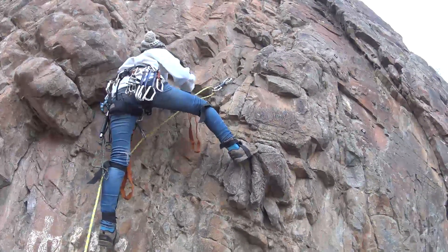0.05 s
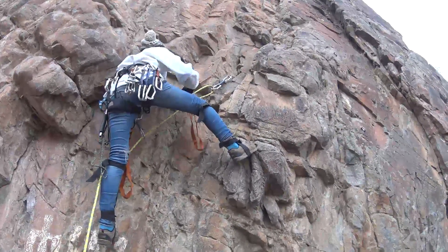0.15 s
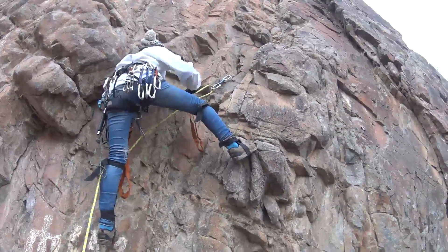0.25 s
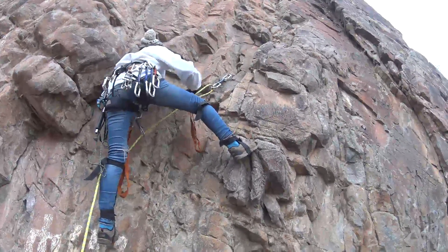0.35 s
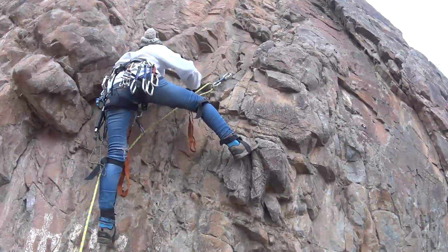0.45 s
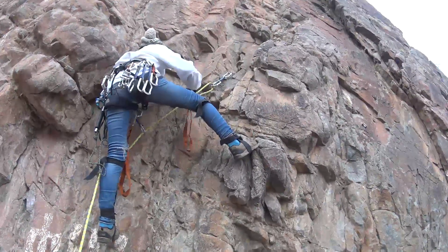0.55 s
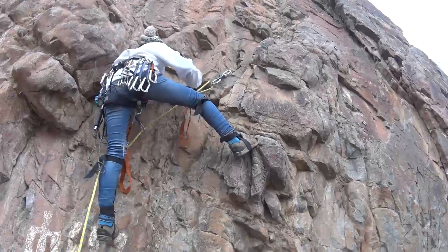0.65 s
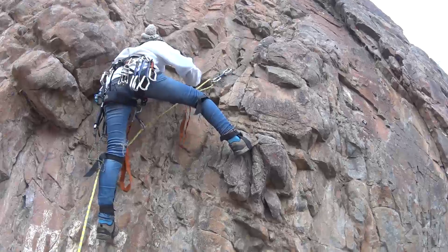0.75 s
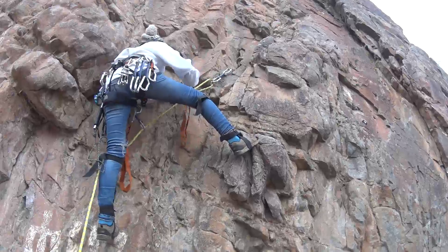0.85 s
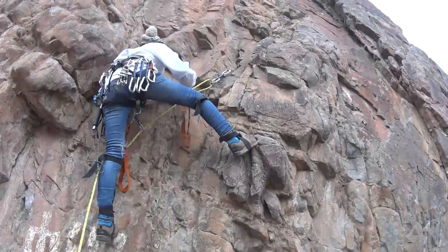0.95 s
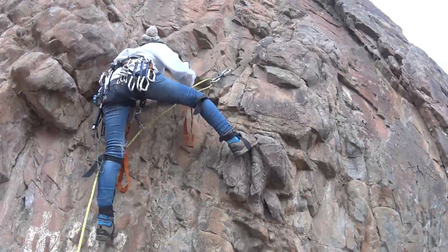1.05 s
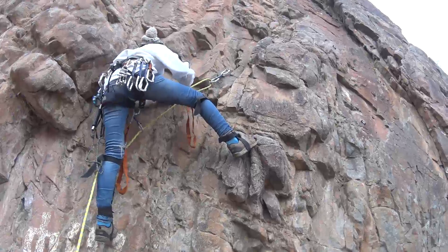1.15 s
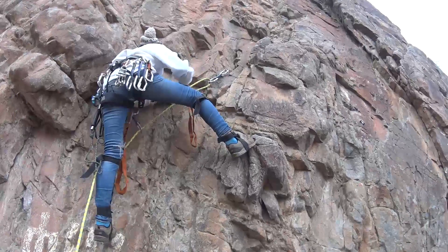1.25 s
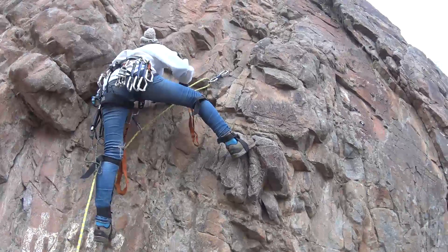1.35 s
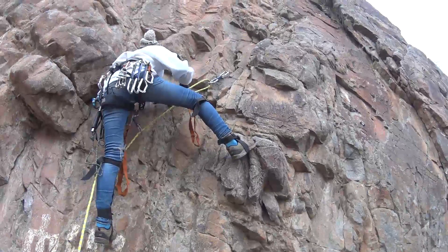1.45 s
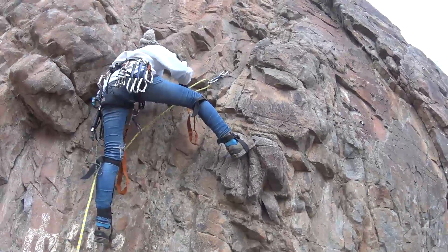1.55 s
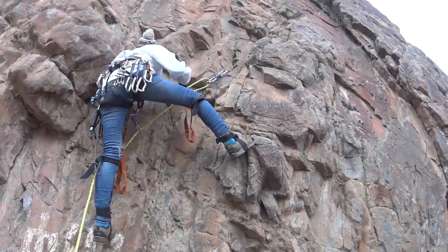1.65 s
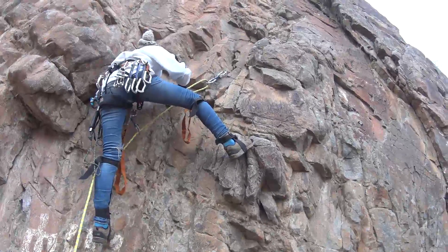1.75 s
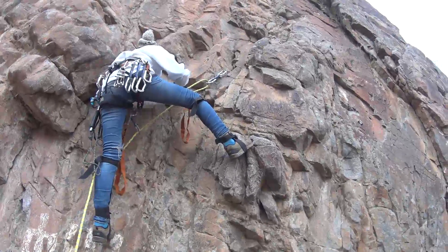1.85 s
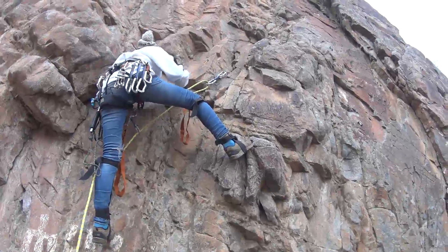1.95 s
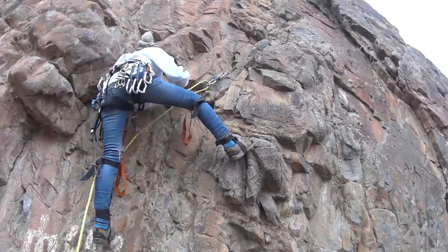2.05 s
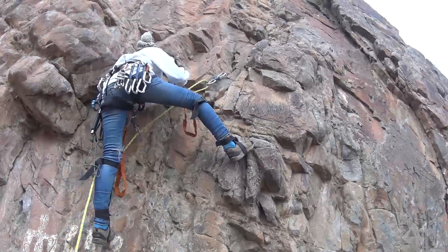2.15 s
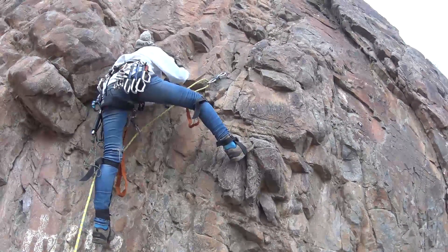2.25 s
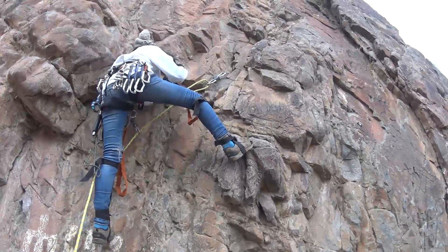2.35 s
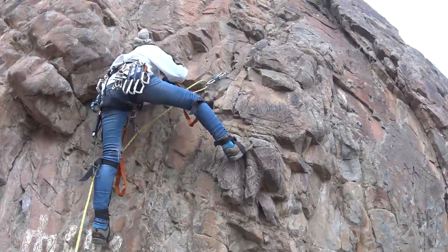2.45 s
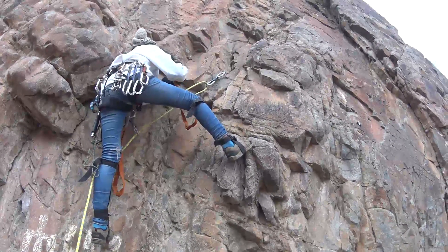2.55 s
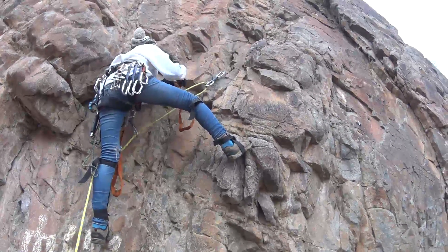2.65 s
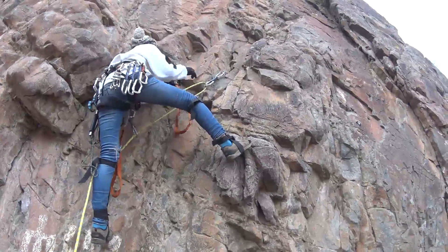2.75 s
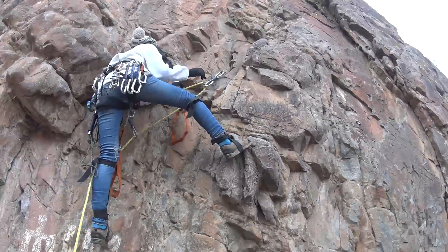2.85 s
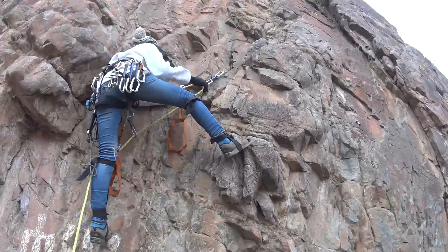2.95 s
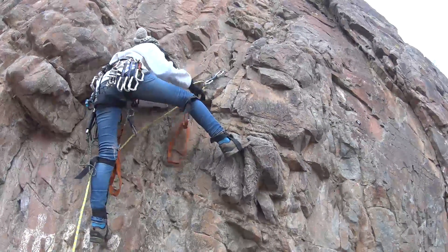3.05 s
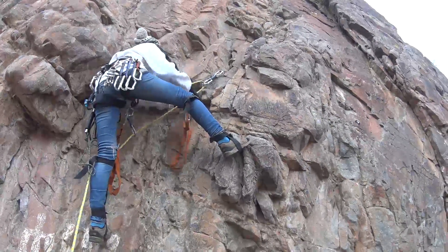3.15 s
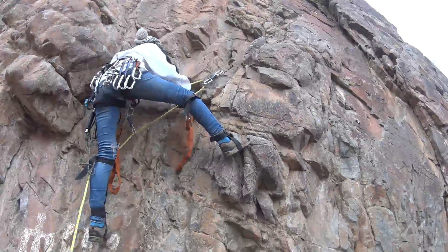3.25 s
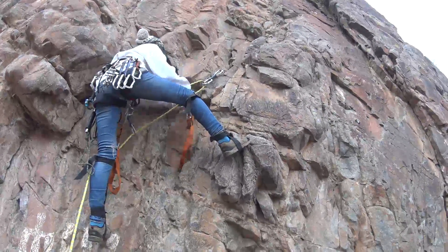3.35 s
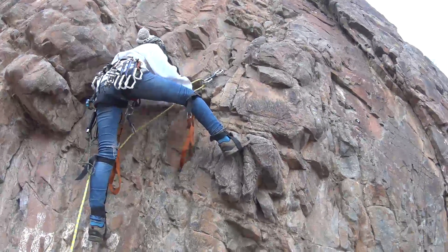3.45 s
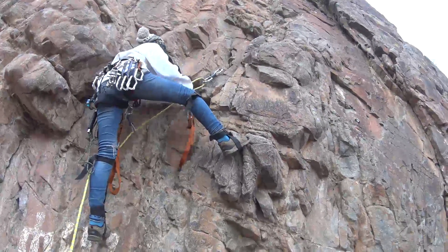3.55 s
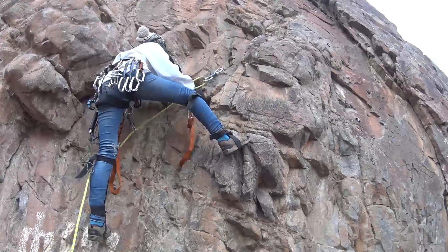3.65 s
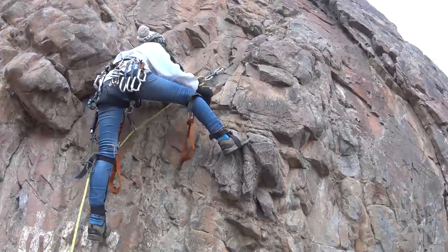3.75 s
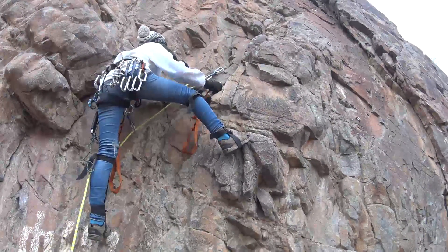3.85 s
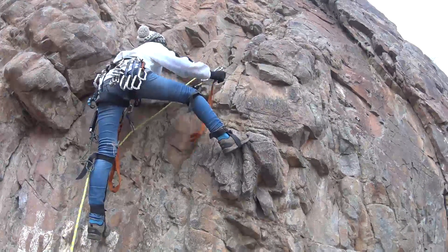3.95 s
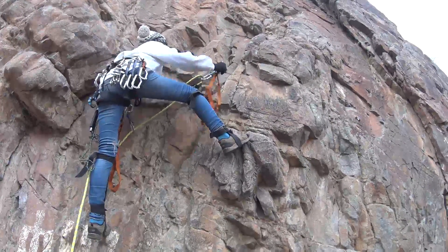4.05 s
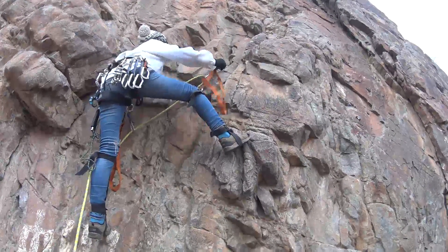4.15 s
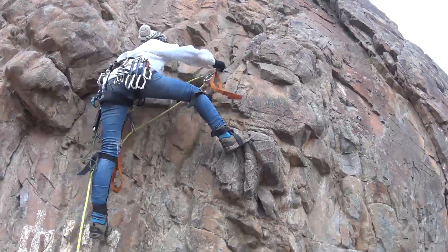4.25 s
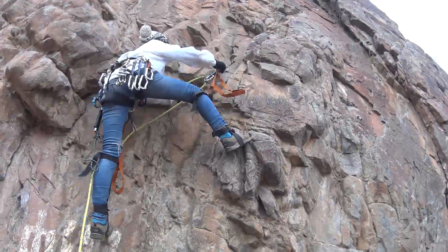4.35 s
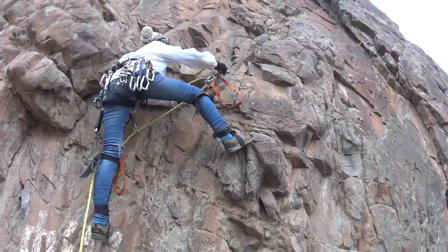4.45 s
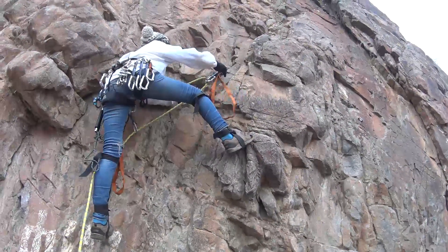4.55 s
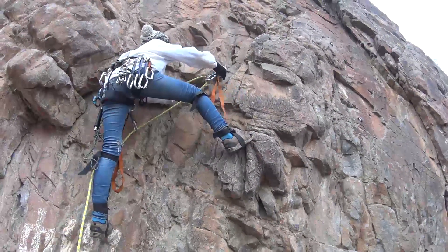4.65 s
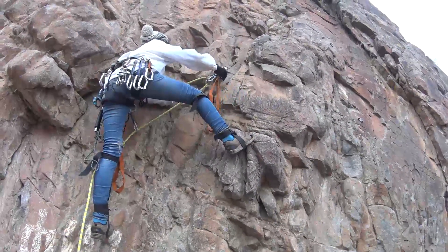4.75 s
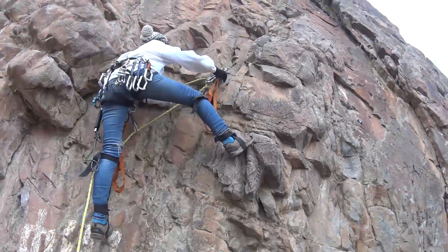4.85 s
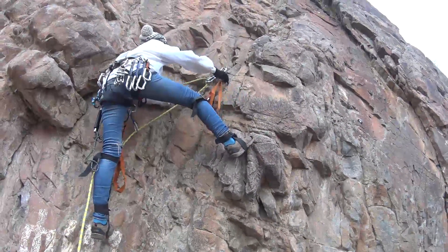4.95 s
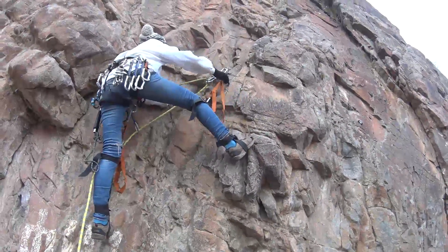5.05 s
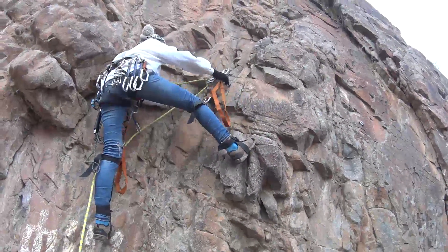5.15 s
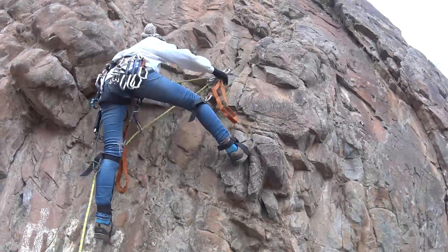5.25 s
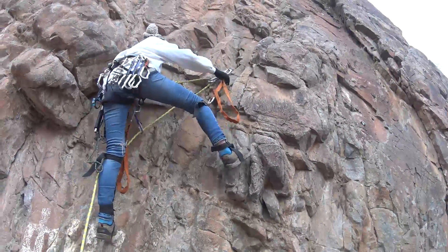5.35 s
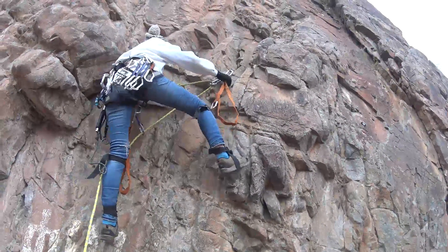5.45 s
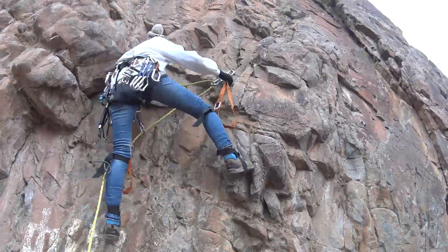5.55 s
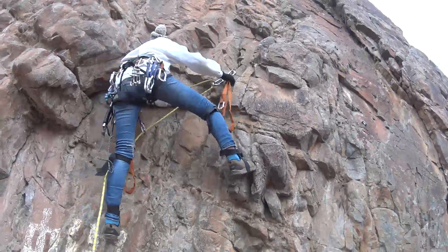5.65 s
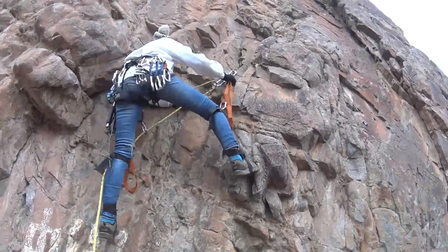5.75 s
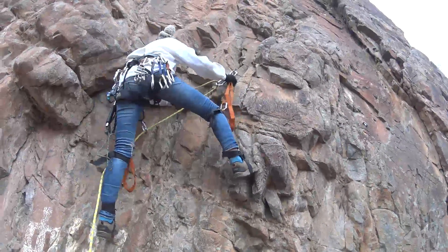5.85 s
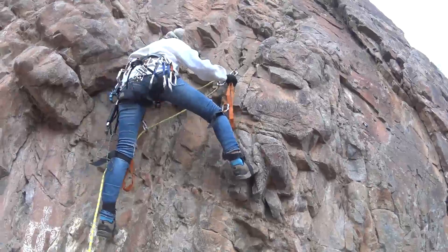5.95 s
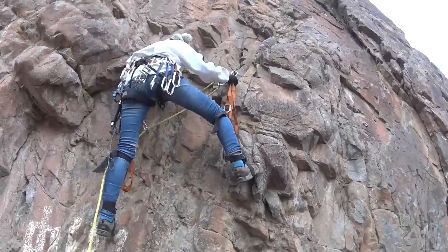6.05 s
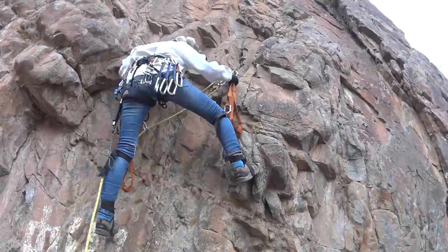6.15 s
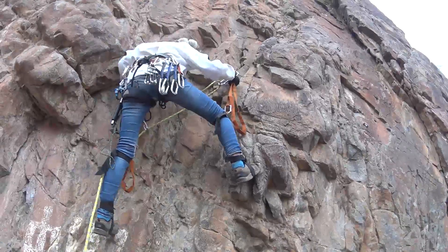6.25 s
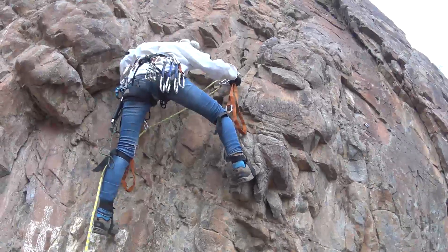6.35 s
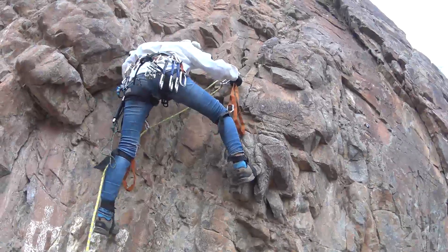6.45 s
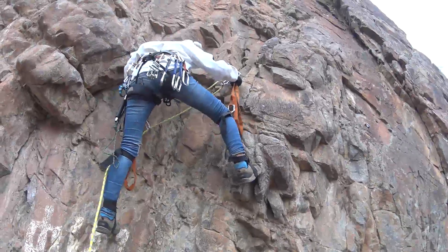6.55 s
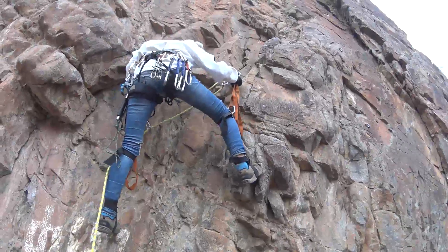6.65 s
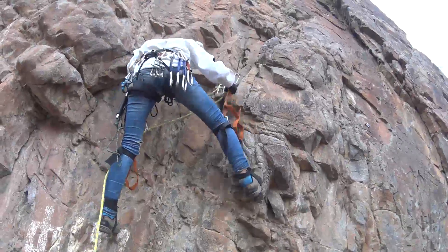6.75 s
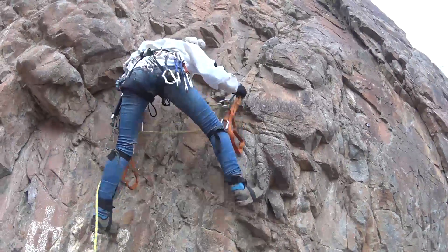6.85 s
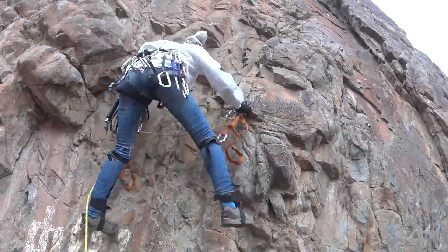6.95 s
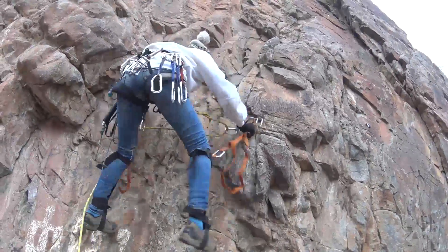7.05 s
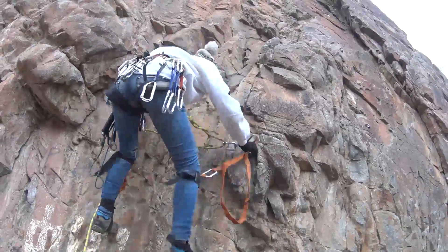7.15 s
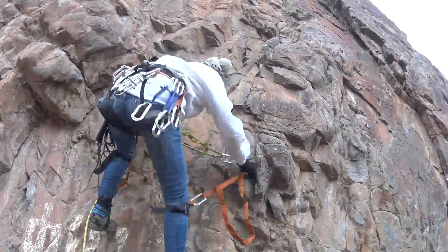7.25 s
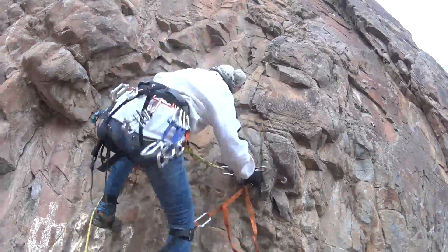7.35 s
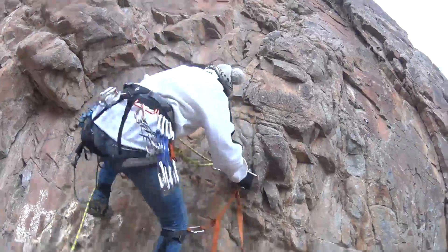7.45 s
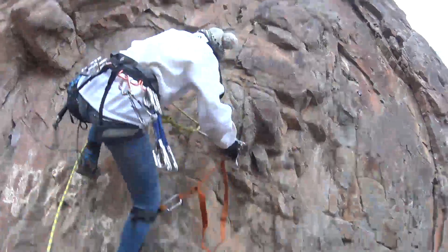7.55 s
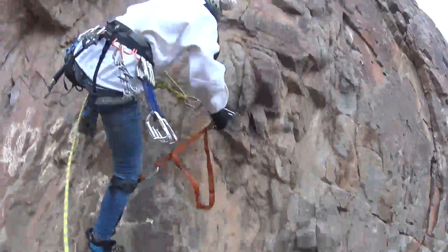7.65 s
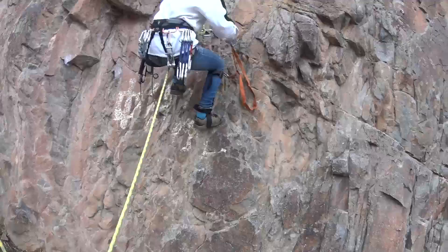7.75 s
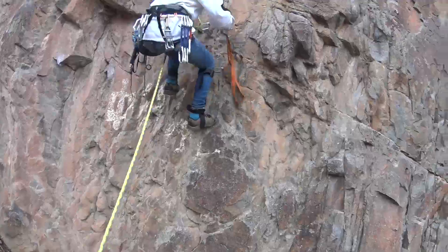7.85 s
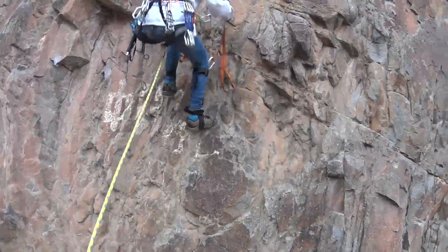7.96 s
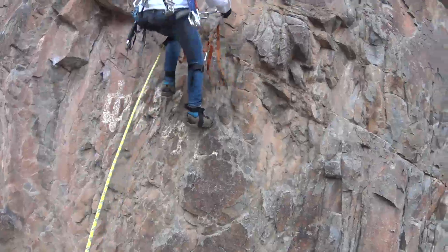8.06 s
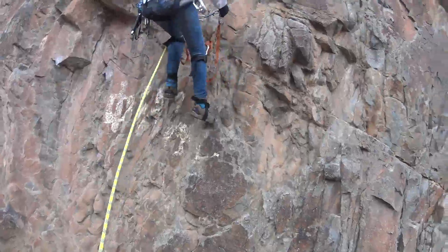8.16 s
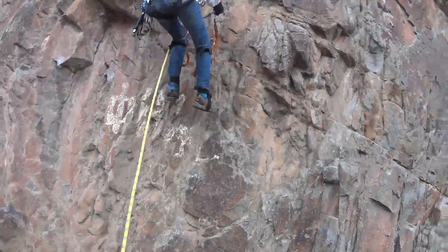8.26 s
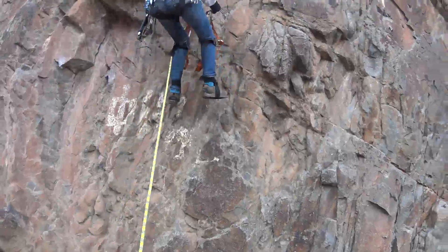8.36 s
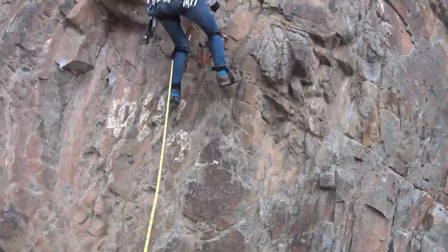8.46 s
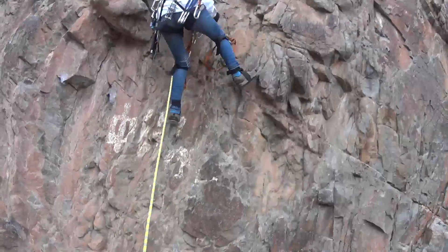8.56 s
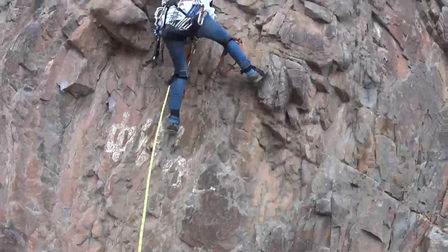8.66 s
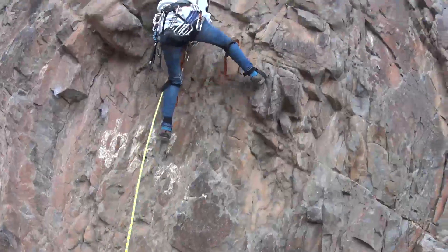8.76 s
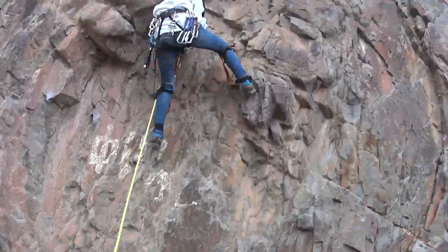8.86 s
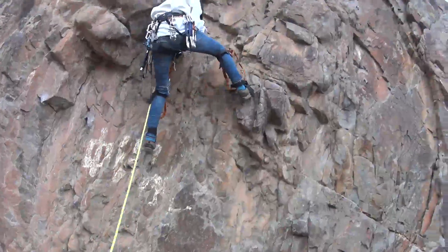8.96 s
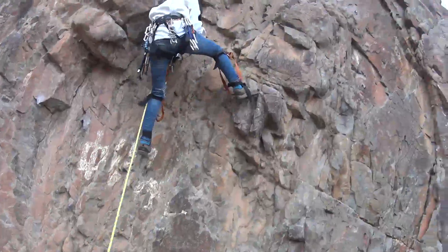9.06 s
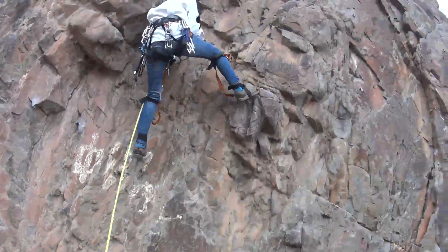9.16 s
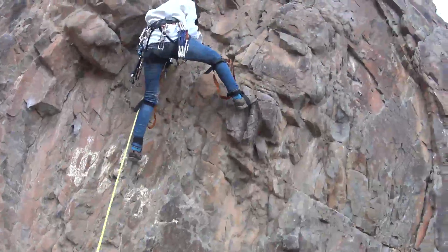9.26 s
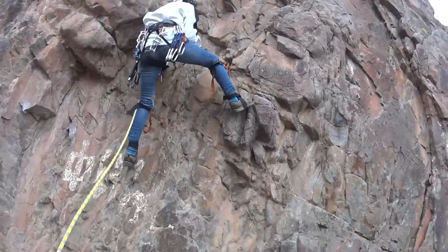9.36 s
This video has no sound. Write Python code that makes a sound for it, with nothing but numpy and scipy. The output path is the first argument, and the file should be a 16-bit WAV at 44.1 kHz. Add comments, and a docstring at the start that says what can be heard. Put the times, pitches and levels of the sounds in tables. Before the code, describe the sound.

A steady, soft outdoor rush lies under everything, wavering very slightly. At 0.1, 0.5 and 0.8 seconds there are faint small metal ticks and thin rings, then only air until a light clink at 4.6. From 5.5 to 6.3 scattered dry carabiner clacks grow firmer, one ringing briefly at 5.7. At 6.7 a dull knock and double clack start the main swing: from 6.8 to 7.8 loud, crowded clacks, bright high rings and overlapping jangle, strongest near 6.95 and 7.4 to 7.6, with a camera bump at 7.4 and faint low rumble. It thins to isolated clacks by 7.8 and 8.3. At 8.5 to 8.7 comes a short jangle with a piercing high ring, dull knocks and low thumps of camera handling. Light clinks at about 9.0, 9.15 and 9.3 end it. The handheld microphone sits a few metres below, with almost no echo.

```python
"""Carabiners on a climber's harness clack, ring and jangle as the rack swings against outdoor rock.
Clacks and jangle are coloured noise bursts with brief rings; free carabiners ring as decaying sine modes.
A steady outdoor rush of shaped noise lies underneath, heard from a handheld camera a few metres below.
Decaying sines give dull knocks; pulses and low noise give the bumps and rumble of the moving camera."""
import sys
import numpy as np
from scipy import signal
from scipy.fft import rfft, irfft, next_fast_len
from scipy.io import wavfile
from scipy.ndimage import uniform_filter1d

SR = 44100
rng = np.random.default_rng(int(sys.argv[2]) if len(sys.argv) > 2 else 0)


def unload_wav(signal):
    """Save mono or channel-first audio to the path in sys.argv[1] as 16-bit WAV at rate SR, clipped to [-1, 1]."""
    wavfile.write(
        sys.argv[1],
        SR,
        np.round(np.clip(np.atleast_2d(signal).T, -1, 1) * 32767).astype(np.int16),
    )


N = 414099
T = np.arange(N) / SR


def amp(db):
    """Decibels to gain."""
    return 10 ** (np.asarray(db) / 20)


def unit(x):
    """Scales to an rms of one."""
    return x / np.sqrt(np.mean(x ** 2) + 1e-20)


def read(points, hz):
    """Reads a table on a logarithmic frequency axis."""
    f, value = np.transpose(points)
    return np.interp(np.log(hz + 1), np.log(f + 1), value)


def decay(t, t60):
    """Falls by 60 dB in t60 seconds."""
    return np.exp(-np.log(1000) * t / t60)


def add(mix, s, sound):
    """Mixes a sound in at time s."""
    part = mix[:, round(s * SR):][:, :sound.shape[-1]]
    part += sound[..., :part.shape[1]]


def colour(x, db_at):
    """Causal (minimum-phase) filter whose gain in dB is the function db_at of frequency."""
    size = next_fast_len(x.shape[-1] + 2048)
    log_gain = np.log(amp(db_at(abs(np.fft.fftfreq(size, 1 / SR)))))
    response = np.exp(np.conj(signal.hilbert(log_gain)))[:size // 2 + 1]
    return irfft(rfft(x, size) * response, size)[..., :x.shape[-1]]


def pair(z, likeness):
    """Makes two unrelated channels partly alike."""
    c = np.clip(likeness, 0, 1)
    return np.array([z[0], c * z[0] + np.sqrt(1 - c ** 2) * z[1]])


def envelope(rows, attack_s, release_t60, sag_db_per_s=0):
    """Each motion builds up, holds or sags in level, then dies away; overlapping motions add."""
    out = np.zeros(N)
    for start, length, db in rows:
        t = np.maximum(T - start, 0)
        attack = np.minimum(t / attack_s, 1)
        release = decay(np.maximum(t - length, 0), release_t60)
        out += attack * amp(db - sag_db_per_s * t) * release
    return out


# spectrum of the open air: f/Hz, relative level/dB per Hz
RUSH_SPECTRUM = [(25, -11.5), (70, -14.5), (125, -5), (220, -1.5), (420, -4), (700, -6), (1050, -1.5),
                 (1600, 1), (2500, -1), (3100, -5), (4700, -7.5), (5800, -14.5), (8000, -23), (11000, -30)]
# how alike the two channels of the open air are: f/Hz, likeness/0-1
RUSH_LIKENESS = [(30, 0.87), (200, 1), (800, 0.69), (1600, 0.91), (2150, 0.66), (3300, 0.9), (3950, 0.36),
                 (4500, 1), (5200, 0.25), (6200, 0.21), (6800, 0.89), (7500, 0.1), (10500, 0.76)]


def rush(level_db=-37.5, waver_db=0.43):
    """Steady distant outdoor noise, shaped by its spectrum, that wavers slightly."""
    size = next_fast_len(N)
    hz = np.fft.rfftfreq(size, 1 / SR)
    noise = rfft(rng.standard_normal((2, size)))
    shaped = pair(noise, read(RUSH_LIKENESS, hz)) * amp(read(RUSH_SPECTRUM, hz))
    knots = np.arange(0, T[-1], .1)
    waver = waver_db * np.interp(T, knots, rng.standard_normal(len(knots)))
    return unit(irfft(shaped, size)[:, :N]) * amp(level_db + waver)


# swings of the rack: start t/s, length/s, drive level/dB before each layer's own gain
RACK_SWINGS = [(6.819, 0.29, -37), (7.141, 0.066, -30), (7.262, 0.079, -39.5), (7.405, 0.38, -29),
               (8.466, 0.023, -35.5), (8.535, 0.058, -33.5), (8.95, 0.08, -40)]


def swing_level():
    """Drive of the swinging rack: it builds up fast, loses energy and settles."""
    return envelope(RACK_SWINGS, attack_s=0.021, release_t60=0.3, sag_db_per_s=17)


def swinging(s):
    """Whether the rack is swinging, or still settling, at time s."""
    settle_s = 0.06
    return any(start < s < start + length + settle_s for start, length, _ in RACK_SWINGS)


def contact_times(per_s):
    """Irregular moments of contact while the rack swings, one at random in each time slot."""
    slots = np.arange(int(T[-1] * per_s))
    times = (slots + rng.random(len(slots))) / per_s
    return [s for s in times if swinging(s)]


def crack(t60, direct=1.3, strike_db=3, strike_t60=0.0062, wall_db=-25, wall_t60=1.0, likeness=0.9):
    """One contact: a sharp tick, a dense short rattle of the metal, and faint scatter from the rock."""
    t = np.arange(SR // 6) / SR
    strike = amp(strike_db) * decay(t, strike_t60)
    wall = amp(wall_db) * decay(t, wall_t60)
    fade = strike + decay(t, t60) + wall
    burst = pair(rng.standard_normal((2, len(t))), likeness) * fade
    burst[:, 0] = direct * 2 * fade[0]  # the tick is a single sample
    return burst


def tinkle(t60, count=5, lowest_hz=3200, highest_hz=11000, port_radians=0.98):
    """Short ring of one of the many small parts, each with random modes of its own."""
    t = np.arange(SR // 12) / SR
    hz = lowest_hz * (highest_hz / lowest_hz) ** rng.random((count, 1))
    phase = port_radians * rng.standard_normal((2, count, 1))
    modes = np.sin(2 * np.pi * hz * t + phase)
    return modes.sum(1) * decay(t, t60) / np.sqrt(count)


# hard contacts: t/s, level/dB before gain, extra low body/dB, extra brightness/dB, main pitch f/Hz
CLACK_HITS = [(0.0998, -35, 7, 0, 4410), (0.776, -30, -9, 2.5, 3740), (4.637, -28.5, 0, -12, 4700),
              (4.703, -38, 12, -2, 3670), (5.5566, -25, 5, -5, 4430), (5.6935, -31, -8, -4, 4830),
              (5.717, -21, -10, -4, 3720), (5.808, -23, -8, 3, 4800), (6.0766, -27.5, -9, -7, 5630),
              (6.2512, -22, -4, 0.5, 6140), (6.711, -24, 8, -8, 4400), (6.7224, -26, 7, 2, 4500),
              (6.8406, -20.5, -2, -6.5, 4800), (6.8635, -21, 0, 1, 4800), (6.947, -13, -2.5, -8.5, 4370),
              (6.974, -18, -4, -7, 4030), (7.0315, -15, 0, -1, 4420), (7.049, -18, 3, -4, 4130),
              (7.1332, -21, 2, 0, 4500), (7.2134, -19.5, 4, 2, 4590), (7.288, -24, 4, 4, 3560),
              (7.2969, -19, 5, 9, 4025), (7.3044, -21, 10, -3, 4400), (7.3264, -27, 11, -3, 3520),
              (7.343, -23.5, -1, -8, 4700), (7.388, -28, -5, -13, 4870), (7.431, -18.5, -14, -7, 4920),
              (7.4454, -18.5, -14, 2.5, 5600), (7.526, -25, 4, 2, 5300), (7.55, -22, 0, 5, 3680),
              (7.579, -23, 9.5, -6, 5470), (7.768, -25, 4.5, -3, 4840), (7.783, -20.5, 0, -1, 5050),
              (7.822, -29.5, 9, 5, 4950), (8.282, -32, -7, -8, 4300), (8.424, -27, 6, -14, 3746),
              (8.5344, -24.5, -18, -6, 4910), (8.6854, -27, -18, -5, 3630), (8.974, -22, -20, 3, 5000),
              (9.143, -29, -7, 3, 5730), (9.33, -35, -11, -3, 5800)]
# basic colour of a clack: f/Hz, filter level/dB
CLACK_COLOUR = [(300, -47), (1000, -26.5), (1700, -5.5), (3000, -4), (4300, -0.5), (5500, -0.5), (7000, -1),
                (8500, -7), (11000, -6.5)]


def clacks(gain_db=-2, t60=0.044, pitch_db=9, pitch_width_hz=450, ring_db=-12):
    """Hard contacts of gear held tight by slings, so it rings only briefly; in a swing they bounce once."""
    rebound_s, rebound_db = 0.006, -8
    out = np.zeros((2, N))
    middle = signal.butter(2, [3200, 7500], "bandpass", fs=SR, output="sos")
    for s, db, body_db, top_db, pitch_hz in CLACK_HITS:
        tilt = [(2400, body_db), (3400, 0), (6500, 0), (9500, top_db)]

        def clack_db(hz):
            peak = pitch_db / (1 + (2 * (hz - pitch_hz) / pitch_width_hz) ** 2)
            return read(CLACK_COLOUR, hz) + read(tilt, hz) + peak

        for k in range(2 if swinging(s) else 1):
            hit = colour(crack(t60), clack_db)
            # level is set by the middle band in the first 5 ms
            strength = signal.sosfilt(middle, hit)[:, :SR // 200].std()
            at, size = s + k * rebound_s, amp(db + k * rebound_db)
            add(out, at, size * amp(gain_db) * hit / strength)
            add(out, at, size * amp(ring_db) * tinkle(t60=.07))
    return out


# modes of a carabiner: f/Hz before slight detuning, relative level/dB, t60/s
CARABINER_MODES = [(2520, -1, .14), (3650, 0, .15), (3740, -2, .15), (4300, -4, .2), (4404, 0, .19),
                   (4720, -2, .1), (5450, 1, .13), (5790, -1, .09), (7085, -1, .15), (8165, -9, .24),
                   (9290, -3, .09), (9375, 0, .08), (10145, -5, .2), (10642, 0, .125)]


def ring(favoured_hz, focus_octaves=0.075, others_db=-11, others_db_per_octave=-10, detune=0.0012,
         chatter_db=-10, port_radians=1.0):
    """A free carabiner rings most strongly in the mode the contact favours, less in those far from it."""
    build_up_s = 0.0068
    t = np.arange(SR // 5) / SR
    hz, mode_db, t60 = np.transpose(CARABINER_MODES)[:, :, None]
    apart = abs(np.log2(hz / favoured_hz))
    focus = np.exp(-(apart / focus_octaves) ** 2)
    others = amp(others_db + others_db_per_octave * apart) * 2 * rng.random(hz.shape)
    weight = amp(mode_db) * np.maximum(others, focus)
    turns = hz * (1 + detune * rng.standard_normal(hz.shape)) * t + rng.random(hz.shape)
    phase = 2 * np.pi * turns + port_radians * rng.standard_normal((2, len(hz), 1))
    # a ramp and smoothed noise stand for tiny repeated contacts that build the ring up and roughen it
    rough = unit(uniform_filter1d(rng.standard_normal((len(hz), len(t))), size=160, axis=-1))
    swell = np.minimum(t / build_up_s, 1) * decay(t, t60) * (1 + amp(chatter_db) * rough)
    return (weight * swell * np.sin(phase)).sum(1)


# carabiners that ring out clearly: t/s, level/dB, f/Hz favoured by the point of contact
CLEAR_RINGS = [(0.465, -43, 5790), (0.608, -39, 9350), (4.637, -36, 3700), (4.703, -43, 3650),
               (5.72, -26, 3800), (5.81, -35, 3600), (6.11, -30, 9350), (6.923, -30, 3680),
               (7.056, -21, 4400), (7.145, -20, 9350), (7.17, -24, 7085), (7.418, -23, 9350),
               (7.467, -18.5, 9250), (7.52, -18, 8160), (7.575, -20, 8160), (7.615, -25, 5450),
               (7.66, -24, 8160), (7.674, -27, 10145), (8.535, -24, 9350), (8.541, -28, 3650),
               (8.568, -25, 5450), (8.572, -16.5, 10640), (8.575, -33, 3650), (8.975, -28, 4720),
               (9.297, -38, 9350)]
# favoured modes taken in turn during swings: f/Hz
SWING_RING_MODES = [8165, 3650, 9375, 5450]


def rings(swing, swing_rings_per_s=35, swing_gain_db=0.5):
    """The clear single rings, and the carabiners that every swing knocks about in turn."""
    out = np.zeros((2, N))
    for s, db, favoured_hz in CLEAR_RINGS:
        add(out, s, amp(db) * ring(favoured_hz))
    for k, s in enumerate(contact_times(swing_rings_per_s)):
        favoured_hz = SWING_RING_MODES[k % len(SWING_RING_MODES)]
        add(out, s, amp(swing_gain_db) * np.interp(s, T, swing) * ring(favoured_hz))
    return out


# dull knocks: t/s, nominal level/dB, f/Hz, t60/s
DULL_KNOCKS = [(6.711, -17, 1540, 0.021), (7.407, -16, 1420, 0.0065), (7.555, -31, 438, 0.038),
               (8.515, -8.5, 1320, 0.0065), (8.637, -21.5, 1140, 0.012), (8.6993, -17.5, 1620, 0.0063)]


def knocks():
    """Dull knocks: heavily damped sines with a softened onset."""
    out, t = np.zeros((2, N)), np.arange(SR // 10) / SR
    onset = 1 - np.exp(-t / 0.00028)
    for s, db, hz, t60 in DULL_KNOCKS:
        add(out, s, -amp(db) * np.sin(2 * np.pi * hz * t) * decay(t, t60) * onset * 2)
    return out


# colour of the jangle: f/Hz, relative filter level/dB
JANGLE_COLOUR = [(300, -29), (1000, 0.5), (2000, 6), (3000, 3), (4500, 5.5), (5600, 6.5), (7000, 1),
                 (8500, 1), (11000, -4.5)]


def jangle(swing, gain_db=-7, contacts_per_s=170, spread_db=3, ring_db=0.5, ring_t60=0.09):
    """Many small overlapping clinks within the swinging rack, following its drive."""
    clinks = np.zeros((2, N))
    for s in contact_times(contacts_per_s):
        size = amp(spread_db * min(rng.exponential(), 2))
        add(clinks, s, size * crack(t60=0.026))
        add(clinks, s, size * amp(ring_db) * tinkle(ring_t60))
    coloured = colour(clinks, lambda hz: read(JANGLE_COLOUR, hz))
    return unit(coloured) * amp(gain_db) * swing


# movements of the camera: start t/s, length/s, rumble level/dB before gain
CAMERA_MOVES = [(7.3, 0.93, -52), (8.45, 0.65, -50), (8.58, 0.115, -38), (9.07, 0.054, -40)]
# colour of the rumble: f/Hz, relative filter level/dB
RUMBLE_COLOUR = [(10, 3.5), (35, -3.5), (70, -4.5), (150, -12), (400, -18.5), (1500, -29.5)]


def handling(gain_db=-1):
    """Low rumble of filtered noise while the camera moves."""
    noise = pair(rng.standard_normal((2, N)), likeness=0.88)
    rumble = colour(noise, lambda hz: read(RUMBLE_COLOUR, hz))
    return unit(rumble) * amp(gain_db) * envelope(CAMERA_MOVES, attack_s=0.063, release_t60=0.2)


# bumps on the camera body: t/s, nominal level/dB, time until the push reverses/s
CAMERA_BUMPS = [(7.407, -20, 0.00064), (8.515, -23, 0.001), (8.627, -12, 0.0014), (8.7, -23, 0.0012),
                (8.709, -25, 0.0023)]


def bumps(lean_db=1.0):
    """Bumps that push the microphone once and let it swing back, leaning to the second channel."""
    out, t = np.zeros((2, N)), np.arange(SR // 10) / SR
    lean = np.array([[-lean_db], [lean_db]])
    for s, db, push_s in CAMERA_BUMPS:
        u = t / push_s
        add(out, s, amp(db + lean) * 2 * u * (1 - u) * np.exp(2 - 2 * u))
    return out


def scene():
    """The open air, the gear and the camera noises."""
    swing = swing_level()
    gear = clacks() + rings(swing) + jangle(swing)
    return rush() + gear + knocks() + handling() + bumps()


# resonances and dips of the microphone housing: f/Hz, width/Hz, level/dB
HOUSING_RESONANCES = [(1672, 364, 6.5), (2116, 428, 8.5), (3615, 150, 3), (4520, 690, 2), (6350, 700, -9),
                      (7800, 770, 1.5), (8870, 420, -5.5), (10580, 720, 4)]
# phase between the two microphone ports: f/Hz, lead of left/rad
PORT_LEAD = [(20, 0), (300, .4), (1100, .4), (1450, .9), (1830, 1), (2080, 2.7), (2220, 5.4), (2400, 6.1),
             (3200, 6.8), (4200, 6.35), (5800, 6.6), (7000, 7.6), (8200, 10), (9400, 13.8), (10300, 12)]
# balance of the two ports: f/Hz, left minus right level/dB
PORT_LEAN = [(50, -1), (200, -3), (700, -0.5), (1200, -1), (1650, 1), (1930, -3.5), (2200, 15.5),
             (2500, -0.5), (3000, 3), (5000, -0.5), (11000, 1.4)]


def record(dry):
    """Housing colours the sound, ports differ in phase and level, peaks round off, the band ends steeply."""
    ceiling = 0.55  # share of full scale near which peaks are rounded off

    def housing_db(f):
        return sum(db * np.exp(-(2 * (f - hz) / width) ** 2) for hz, width, db in HOUSING_RESONANCES)

    heard = colour(dry, housing_db)
    size = next_fast_len(N)
    hz = np.fft.rfftfreq(size, 1 / SR)
    lean = amp(read(PORT_LEAN, hz))
    right_lag = np.exp(-1j * read(PORT_LEAD, hz))
    ports = np.array([lean, right_lag]) * np.sqrt(2 / (1 + lean ** 2))  # keeps the summed port power
    stereo = irfft(rfft(heard, size) * ports, size)[:, :N]
    limited = stereo / (1 + (stereo / ceiling) ** 6) ** (1 / 6)
    low_pass = signal.firwin(801, 11080, window=("kaiser", 8), fs=SR)
    return signal.oaconvolve(limited, low_pass[None], "same", axes=1)


dry = scene()
out = record(dry)
unload_wav(out)
```